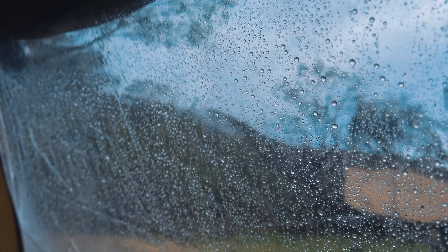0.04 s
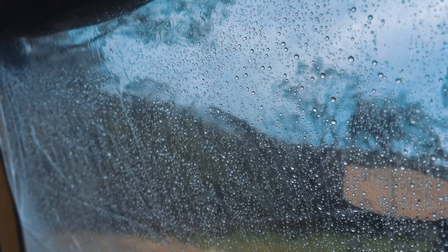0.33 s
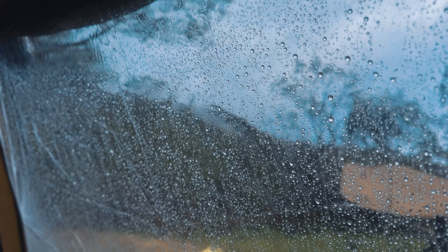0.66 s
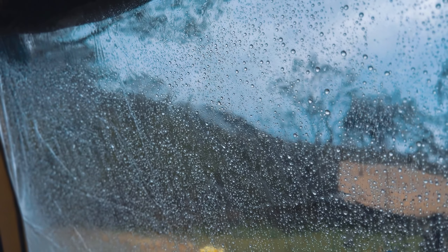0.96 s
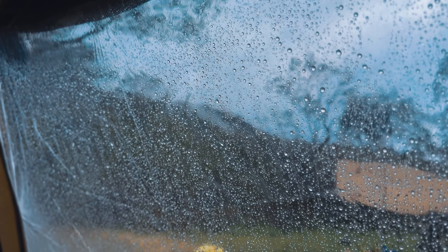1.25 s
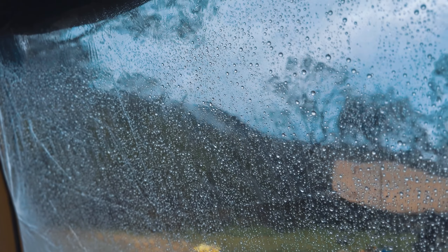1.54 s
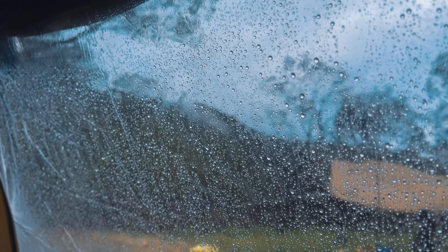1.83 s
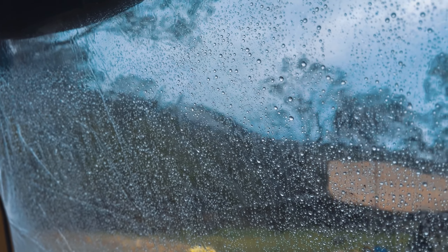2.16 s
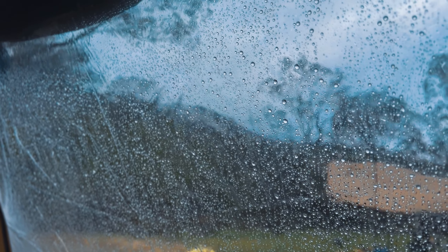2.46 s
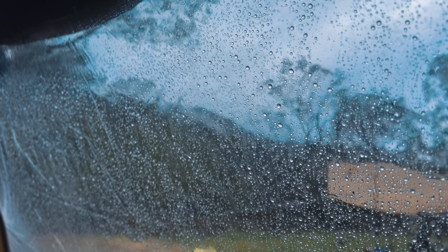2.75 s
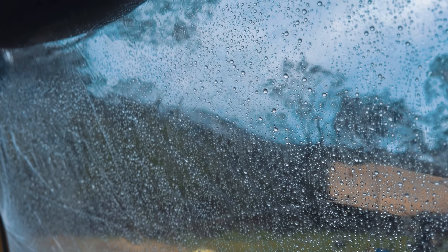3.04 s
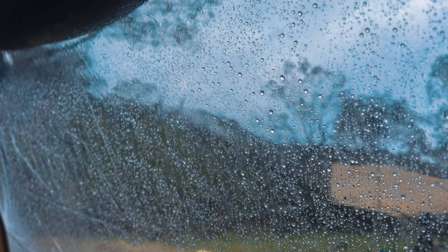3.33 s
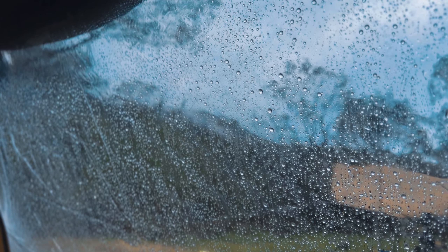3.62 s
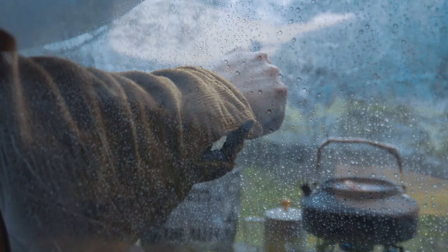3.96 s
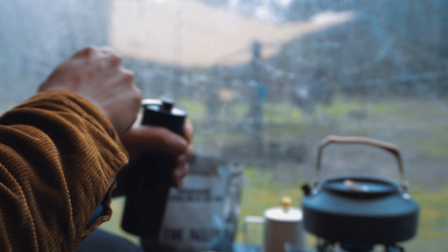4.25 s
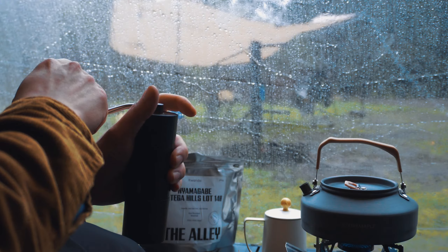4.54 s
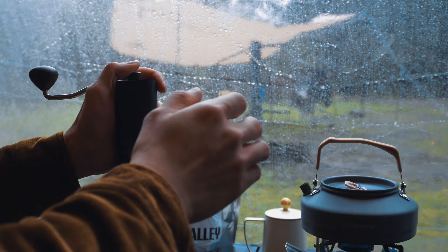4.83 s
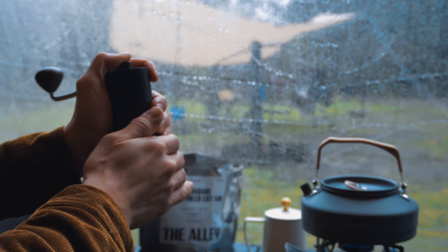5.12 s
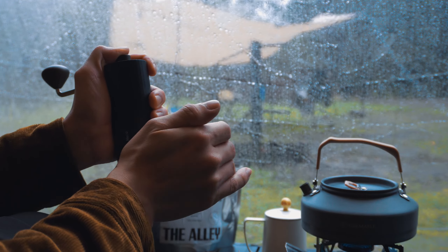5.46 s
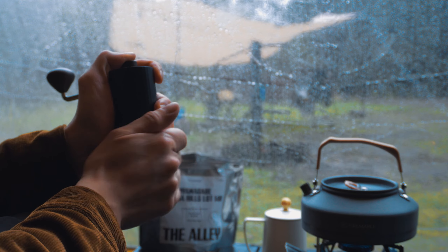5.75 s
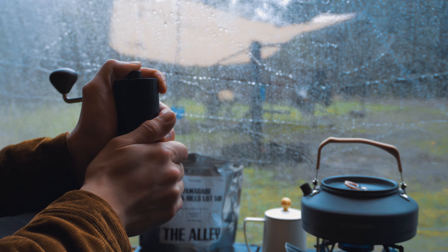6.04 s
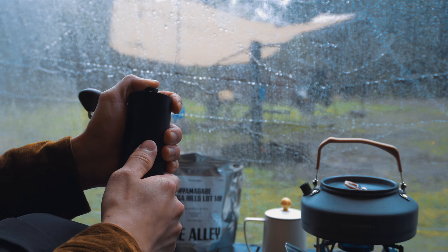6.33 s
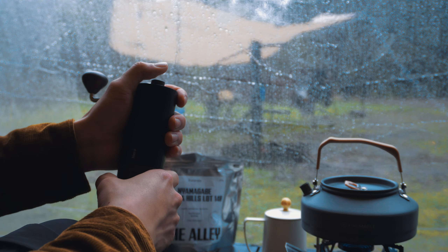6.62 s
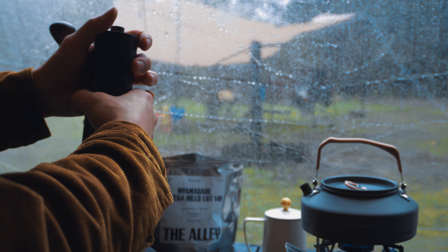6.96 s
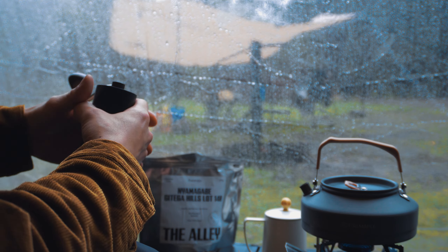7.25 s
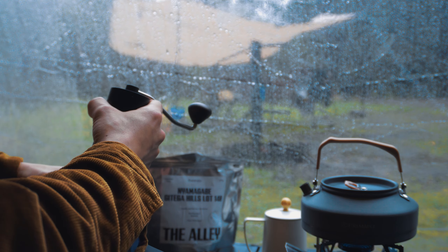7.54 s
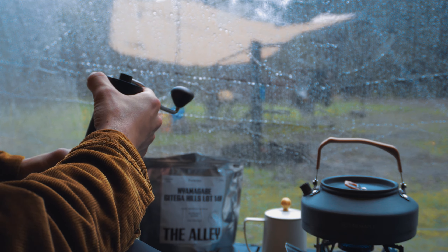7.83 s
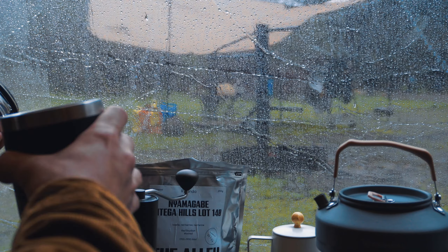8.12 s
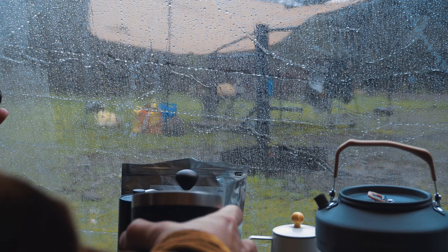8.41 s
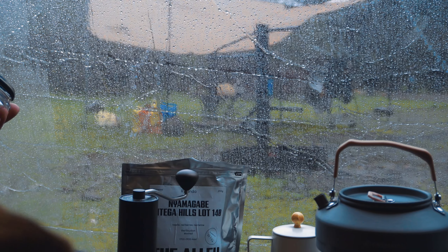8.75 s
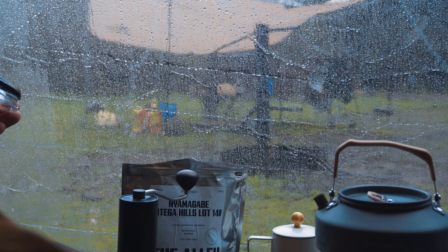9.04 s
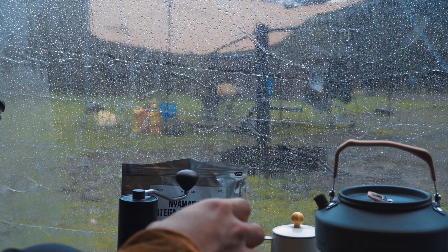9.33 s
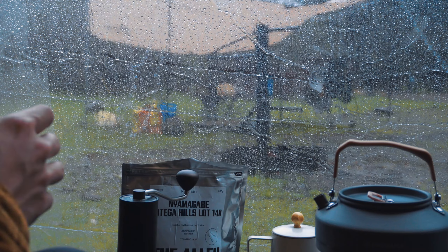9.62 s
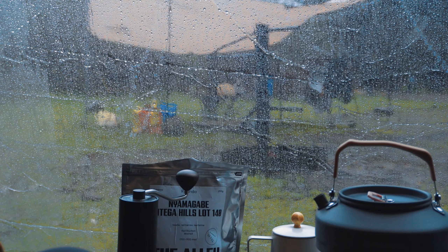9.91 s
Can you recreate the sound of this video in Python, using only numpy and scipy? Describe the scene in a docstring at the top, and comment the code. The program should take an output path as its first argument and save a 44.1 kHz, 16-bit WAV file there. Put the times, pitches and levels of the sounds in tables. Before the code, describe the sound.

Close coffee grinding by hand gives way to clacking parts and a ringing knock, with raindrops on tent fabric and a heating kettle.

```python
"""Grinding coffee in a rainy tent

Close to the microphones a hand grinder crunches beans, stalls three times, then runs empty.
Its loose parts clack as it is handled, and it lands on the table with a ringing knock.
Drops slap and thump the taut fabric near by, over a wash of rain further off. In the background
bubbles make a kettle sing softly over a gas burner, and once a sleeve brushes past."""
import sys
import numpy as np
from scipy import signal
from scipy.fft import rfft, irfft
from scipy.io import wavfile
from scipy.ndimage import uniform_filter1d, minimum_filter1d

SR = 44100
rng = np.random.default_rng(int(sys.argv[2]) if len(sys.argv) > 2 else 0)


def wav_record(signal):
    """Record a signal, one row per channel, as 16-bit PCM in the file named by sys.argv[1]."""
    frames = np.transpose(np.atleast_2d(signal))
    bounded = np.clip(frames, -1, 1)
    # unit amplitude maps onto the largest positive 16-bit level
    quanta = np.round(bounded * 32767).astype(np.int16)
    wavfile.write(sys.argv[1], SR, quanta)


N = 440118
TIME = np.arange(N) / SR
AGE = np.arange(SR // 3) / SR  # seconds since a blow
BINS = np.fft.rfftfreq(4096, 1 / SR)

# All levels in the tables are relative.
# Pushes on the crank. Each row: start and end in seconds, level in dB, rise and run-down t60 in seconds.
CRANK_PUSHES = [(0, 0.215, -26.5, 0.00067, 0.11), (0.363, 1.54, -23.5, 0.017, 0.19),
                (1.716, 3.329, -24, 0.0025, 0.1), (3.433, 3.685, -25.5, 0.004, 0.62),
                (3.752, 3.81, -34, 0.0092, 0.72)]
# The burrs briefly lose their bite. Each row: centre and half length in seconds, dip in dB.
BURR_SLIPS = [(1.779, 0.019, -9.5), (2.282, 0.012, -16), (2.339, 0.012, -14), (2.666, 0.05, -3.5),
              (3.006, 0.012, -10), (3.258, 0.034, -5)]
# The largest beans break. Each row: start in seconds, level in dB.
BEAN_CRACKS = [(0.0014, -11.5), (0.123, -5.5), (0.1783, -9.5), (0.444, -8.5), (0.9438, -7.5), (1.037, -9),
               (1.2274, -8), (1.3583, -11), (1.672, -20.5), (1.7113, -9.5), (1.746, -8), (1.944, -5.5),
               (2.128, -10), (2.2336, -5.5), (2.2847, -7), (2.2966, -13), (2.3496, -9.5), (2.4547, -12),
               (2.489, -9), (3.0345, -10), (3.0608, -5), (3.3697, -16.5), (3.4456, -8)]
# Pitch of the snap of each size of fragment in Hz, coarse to fine.
FRAGMENT_PITCHES = [1100, 1600, 2070, 2600, 3100, 3870, 5000, 7600]
# Loose parts meet. Each row: start in seconds, level in dB, t60 in seconds, tilt in dB/octave, ring in Hz.
PART_CLACKS = [(4.2624, -10.5, 0.066, 0, 2280), (4.328, -10.5, 0.076, 2, 1720),
               (5.1272, -1, 0.054, -0.5, 2290), (5.1391, -7.5, 0.087, 2, 1720),
               (5.3619, -6, 0.087, 3.5, 3150), (5.3716, -5, 0.14, -1, 1600), (5.593, -1.5, 0.12, 1.5, 3750),
               (5.8103, 1.5, 0.11, 0, 2320), (6.0263, 4, 0.06, 2.5, 4770), (6.0383, -3, 0.065, 3.5, 1600),
               (8.5372, -6.5, 0.054, 2.5, 1620), (8.618, -11, 0.055, -1, 2820)]
# The grinder lands and rocks. Each row: start in seconds, level in dB.
TABLE_BLOWS = [(8.8612, -6), (8.863, 2), (8.8705, -3)]
# Heavy drops close by. Each row: start in seconds, slap and thump in dB, tilt in dB/octave,
# snap pitch and nominal thump pitch in Hz.
NEAR_DROPS = [(0.049, -5, -29, 0, 3300, 324), (0.198, -8, -33.5, -1, 3920, 423),
              (0.263, -6.5, -37, 0, 1330, 204), (0.917, -12, -46, -1, 1320, 300),
              (1.426, -0.5, -29.5, 0.5, 2970, 500), (2.0623, -5, -44, -2, 1740, 240),
              (3.301, -2.5, -29, -1.5, 2980, 430), (3.416, -9.5, -31, -1, 1380, 740),
              (3.75, -16, -30.5, -2, 2600, 564), (4.105, -8.5, -24.5, -1, 2160, 476),
              (4.124, -12, -30.5, 0, 2300, 350), (4.565, -6.5, -30.5, -1.5, 3300, 270),
              (5.156, -1, -23.5, 0, 1400, 426), (5.65, -14.5, -30, -0.5, 2310, 387),
              (5.766, 0.5, -20, 1, 1860, 424), (7.024, -15, -39, -1, 3250, 595),
              (7.228, -10, -37, -4, 2330, 327), (7.242, -7.5, -47, 5.5, 2280, 690),
              (7.977, -12, -26.5, 0, 2290, 315), (8.534, -10, -28.5, 1.5, 1680, 380),
              (9.364, -2.5, -49, -1.5, 4800, 440), (9.892, -1.5, -25, 0, 2300, 231),
              (9.968, 4, -28, -2.5, 2420, 490)]
# The stove as the water heats. Each row: time in seconds, then flame, simmer and singing in dB.
STOVE_LEVELS = [(0, -46.5, -48.5, -54), (1.7, -46.5, -51.5, -61), (4, -42.5, -38.5, -47.5),
                (6.3, -42, -37, -46.5), (8.08, -42, -37, -43), (8.2, -42, -34.5, -39),
                (9.98, -42, -35.5, -37.5)]
# Whistle of the gas jet. Each row: time in seconds, pitch in Hz.
JET_PITCH = [(0, 8660), (4, 8710), (6.6, 8710), (8.3, 8755), (9.98, 8755)]
# A sleeve brushes past. Each row: time in seconds, level in dB.
SLEEVE_LEVELS = [(6.88, -59), (7.0, -42.5), (7.06, -47), (7.12, -42), (7.2, -56)]

# Resonances. Each row: centre in Hz, half width in Hz, level in dB.
MILL_RESONANCES = [(1772, 32, -3), (3004, 21, -4), (3265, 55, 2), (4780, 190, -10.5), (8400, 170, -40)]
CUP_RESONANCES = [(934, 58, -3.5), (1175, 32, -2), (1319, 44, 9)]  # the catch cup
KETTLE_RESONANCES = [(993, 29, -6), (1516, 18, -3), (2353, 20.4, 9), (2900, 29, -2), (3640, 200, -9.5)]
SINGING_RESONANCES = [(490, 86, -10), (1115, 59, -5.5), (1545, 39, 3.5), (1720, 27, -8), (2204, 69, 1),
                      (2814, 32, 3), (3150, 36, -13), (3370, 140, -6), (4800, 150, -8.5), (6000, 41, -32)]  # these join as the water heats

# Struck modes. Each row: pitch in Hz, level in dB, t60 in seconds.
GRINDER_MODES = [(615, -9, .06), (830, -13, 0.14), (1160, -10, 0.11), (1234, -7, 0.21), (1460, -13, .1),
                 (1786, -2, 0.3), (2320, -6, 0.23), (2910, -2.5, 0.068), (3490, -6, 0.18),
                 (3900, -13, 0.21), (5539, -18.5, 0.21), (8100, -18, 0.13)]
FABRIC_MODES = [(200, -17, 0.061), (233, -1, 0.075), (293, 4.5, 0.036), (408, 2, 0.055), (690, -6.5, 0.089)]

# Spectra. Each row: frequency in Hz, gain in dB.
CRUNCH_SPECTRUM = [(120, -48), (300, -36), (600, -18), (850, -11), (1250, -11), (1520, -7), (2100, -4.5),
                   (2900, -2.5), (4100, -7), (5000, -8), (6000, -14.5), (9000, -14), (12000, -25.5),
                   (15500, -39.5)]
CLACK_SPECTRUM = [(88, -54), (150, -14), (519, -12), (1060, -10), (1400, -2.5), (1630, -5), (1940, -8),
                  (2270, -3.5), (3480, -8.5), (4060, -7.5), (4840, -12.5), (6470, -15.5), (10500, -27.5),
                  (15500, -42)]
KNOCK_SPECTRUM = [(60, -35), (300, -10.5), (700, -10), (870, 2), (1250, 10), (1600, -1), (3000, -5),
                  (4500, -10), (8500, -23), (15000, -43)]
SLAP_SPECTRUM = [(30, -39), (80, -22), (200, -3.5), (500, -1.5), (1300, -4.5), (2500, -3), (4200, -1),
                 (6500, -9), (9000, -18.5), (15000, -37)]
FAR_RAIN_SPECTRUM = [(100, -24), (500, 9.5), (1500, 4), (3500, -4.5), (6000, -3), (9000, -6),
                     (15000, -18.5)]
FLAME_SPECTRUM = [(18, -64), (30, -24), (188, -1), (249, -5), (323, -2.5), (366, -6), (490, 0.5),
                  (647, -0.5), (803, -11.5), (982, -1.5), (1060, -11.5), (1200, -11.5), (1560, -68),
                  (2640, -120)]
SIMMER_SPECTRUM = [(400, -25.5), (750, -11), (1250, -5.5), (1700, -1.5), (2600, -4), (3700, -6), (5200, -9),
                   (6500, -16.5), (8800, -20.5), (10500, -28), (15500, -44)]  # bubbles on the kettle floor
MIC_SIDE_GAIN = [(30, -22), (150, -34), (500, -28.5), (1000, -23), (2000, -16), (4000, -9), (8000, -3.5),
                 (14000, -1.5)]  # side against mid
MIC_BALANCE = [(250, 0.3), (2000, -0.94), (12000, -1)]  # left against right

TURN_S, FREE_AT_TURN = 0.591, 0.78  # one turn of the crank; how far through it the grip is loosest
CUP_DB, CUP_SWING_DB, MILL_SWING_DB = -9, 4, 5  # cup ring; swing of cup and lowest mill ring over a turn


def grinder(crunch_db=-1, load_db=0.5, crack_db=-11, crack_t60=0.092, clump_db=1.17, brittle_db=-7):
    """Close up, fragments snap in clumps between the burrs and ring the mill and its catch cup."""
    bite, angle = crank()
    crunch_power = (bite * amp(crunch_db + load_db * drift(rate_hz=17))) ** 2  # beans feed in unevenly
    crack_power = np.zeros((1, N))
    for start, db in BEAN_CRACKS:
        add(crack_power, start, (amp(db + crack_db) * dying(crack_t60))[None] ** 2)
    snaps = evened(clicks(per_s=3400, spread_db=2) * amp(clump_db * drift(rate_hz=58)))
    snaps *= np.sqrt(crunch_power + crack_power)[0]
    snaps = fragments(from_many_spots(snaps, t60=0.045, wet_db=0.5, count=16))
    # a whole bean splits with a drier, brighter crackle than its crumbs
    splinters = wide_clicks(per_s=5900, spread_db=1.5) * np.sqrt(crack_power)
    brittle = amp(brittle_db) * colour(splinters, shape(CRUNCH_SPECTRUM, tilt_db=1.5))
    # the grip shifts with each turn, damping cup and mill and freeing them again
    free = np.cos(angle - 2 * np.pi * FREE_AT_TURN)
    crunch = shape(CRUNCH_SPECTRUM)
    (hz, width, db), *upper = MILL_RESONANCES
    loose = colour(snaps, crunch + humps([(hz, width, db + MILL_SWING_DB)] + upper))
    held = colour(snaps, crunch + humps([(hz, width, db - MILL_SWING_DB)] + upper))
    mill = (loose * (1 + free) + held * (1 - free)) / 2
    cup = colour(snaps * amp(CUP_DB + CUP_SWING_DB * free), humps(CUP_RESONANCES) * crunch)
    return mill + cup + brittle


def crank():
    """The hand's pushes give the strength of the crunch and the crank's angle, which rests in a stall."""
    bite, moving = np.zeros(N), np.zeros(N)
    for start, end, db, rise, t60 in CRANK_PUSHES:
        run_down = amp(-60 * np.maximum(TIME - end, 0) / t60)
        bite += amp(db) * np.clip((TIME - start) / rise, 0, 1) * run_down
        moving += (TIME >= start) & (TIME < end)
    slip_db = sum(db * np.exp(-((TIME - centre) / half) ** 2) for centre, half, db in BURR_SLIPS)
    angle = 2 * np.pi * np.cumsum(moving) / (TURN_S * SR)
    return bite * amp(slip_db), angle


def fragments(snaps, shift_db=2):
    """Coarse and fine fragments come in changing shares, so the colour of the crunch keeps shifting."""
    spectrum = rfft(snaps)
    log_hz = np.log(np.fft.rfftfreq(N, 1 / SR) + 1)
    bands = (np.interp(log_hz, np.log(FRAGMENT_PITCHES), one) for one in np.eye(len(FRAGMENT_PITCHES)))
    return sum(irfft(spectrum * band, N) * amp(shift_db * drift(rate_hz=21)) for band in bands)


def handling(clack_db=9, contact_db=-4, mill_db=-10, ring_db=3, seat_t60=0.0033):
    """Each clack is a hard contact and a short dense rattle; the struck part rings at its own pitch."""
    out = np.zeros((2, N))
    mill = amp(mill_db) * humps(MILL_RESONANCES)
    for start, db, t60, tilt_db, hz in PART_CLACKS:
        rattle = (scatter(t60) + amp(contact_db) * scatter(t60=0.013)) * (1 - dying(seat_t60))
        body = shape(CLACK_SPECTRUM, tilt_db) + mill + humps([(hz, 70, ring_db)])
        add(out, start, amp(db + clack_db) * colour(rattle, body))
    return out


def set_down(ring_db=-12, knock_db=11):
    """The grinder knocks on the table, rocks once, and its body rings on from the hardest blow."""
    out = np.zeros((2, N))
    for start, db in TABLE_BLOWS:
        add(out, start, amp(db + knock_db) * colour(scatter(t60=0.081), shape(KNOCK_SPECTRUM)))
    start, db = max(TABLE_BLOWS, key=lambda blow: blow[1])
    swelling = 1 - dying(t60=0.01)  # the blow takes a moment to spread through the body
    add(out, start, amp(db + ring_db) * in_tent(ring(GRINDER_MODES) * swelling, t60=0.05, wet_db=-35))
    return out


def rain(patter_db=-33, patter_thump_db=-52, spread_db=3, wash_db=-51, low_cut_hz=125, count=70):
    """Heavy drops near the microphones, a light patter over the rest of the roof, and a far wash."""
    out = np.zeros((2, N))
    for start, *blow in NEAR_DROPS:
        add(out, start, drop(*blow))
    for when, size, dullness, snap, panel in rng.uniform(0, 1, (count, 5)):
        size_db = -spread_db * np.log(size + 0.034)
        small = drop(patter_db + size_db, patter_thump_db + size_db, tilt_db=-2 * dullness,
                     snap_hz=1200 + 3000 * snap, thump_hz=170 + 350 * panel)
        add(out, when * N / SR, small)
    # the drops and patter carry no deep bass
    out = signal.sosfilt(signal.butter(2, low_cut_hz, "high", fs=SR, output="sos"), out)
    return out + amp(wash_db) * colour(rng.standard_normal((2, N)), shape(FAR_RAIN_SPECTRUM))


def drop(slap_db, thump_db, tilt_db, snap_hz, thump_hz, slap_gain_db=10, thump_gain_db=7, wet_db=-3):
    """A drop bursts on the fabric; the taut panel thumps, each spot at its own pitch."""
    burst = 0.62 * scatter(t60=0.0044) + amp(wet_db) * scatter(t60=0.097)  # spray, then reflections
    flattening = AGE / 0.00022
    burst[0] += 0.2 * unit((1 - flattening) * np.exp(-flattening))  # the drop pushes, the fabric rebounds
    burst[0, 0] += 0.25  # sharp tick of first contact
    slap = colour(burst, shape(SLAP_SPECTRUM, tilt_db) + humps([(snap_hz, 130, 1)]))
    panel = ring(FABRIC_MODES + [(thump_hz, 1.5, 0.05)], pitch=rng.uniform(1.0, 1.03))
    thump = in_tent(panel, t60=0.049, wet_db=0)
    return amp(slap_db + slap_gain_db) * slap + amp(thump_db + thump_gain_db) * thump


def stove(ring_db=1, hiss_db=-19):
    """Behind the grinder the flame roars softly, and tiny collapsing bubbles ring the kettle."""
    times, *levels = np.transpose(STOVE_LEVELS)
    flame, simmer, singing = (amp(np.interp(TIME, times, db)) for db in levels)
    roar = colour(rng.standard_normal((2, N)), shape(FLAME_SPECTRUM)) * amp(0.42 * drift(rate_hz=30))
    bubbles = evened(from_many_spots(clicks(per_s=6000, spread_db=3), t60=0.048, wet_db=-1.5))
    bubbles *= amp(0.26 * drift(rate_hz=18))
    hot_bubbles = wide_clicks(per_s=4800, spread_db=0)
    hiss = shape(SIMMER_SPECTRUM)
    water = simmer * colour(bubbles, hiss + amp(ring_db) * humps(KETTLE_RESONANCES))
    water += singing * colour(hot_bubbles, amp(hiss_db) * hiss + humps(SINGING_RESONANCES))
    return flame * roar + water


def gas_jet(level_db=-60):
    """The burner's jet whistles thinly, trembling around one slowly rising pitch."""
    tremble_hz = 24 * np.array([drift(rate_hz=70) for _ in range(2)])
    hz = np.interp(TIME, *np.transpose(JET_PITCH)) + tremble_hz
    phase = 2 * np.pi * np.cumsum(hz, 1) / SR
    return amp(level_db) * evened(np.sin(phase) * amp(2 * drift(rate_hz=40)))


def sleeve():
    """Cloth fibres slip in a soft, bright rustle."""
    level = amp(np.interp(TIME, *np.transpose(SLEEVE_LEVELS), left=-120, right=-120))
    fibres = evened(from_many_spots(clicks(per_s=4500, spread_db=1), t60=0.04, wet_db=-6, count=4))
    return level * colour(fibres, shape(SLAP_SPECTRUM, tilt_db=9.5))


def from_many_spots(x, t60, wet_db, count=14):
    """Each click starts at one of many spots, each with its own reflections."""
    spot = rng.integers(0, count, len(x))
    return sum(in_tent(x * (spot == k), t60, wet_db) for k in range(count))


def in_tent(x, t60, wet_db):
    """The direct sound reaches the microphones from the middle, short reflections from all round."""
    response = amp(wet_db) * scatter(t60)
    response[0, 0] += 1
    return signal.oaconvolve(x[None], unit(response), axes=1)[:, :len(x)]


def scatter(t60):
    """A dying spray of reflections, mid and side, of energy 1."""
    return unit(rng.choice([-1, 1], (2, len(AGE))) * dying(t60))


def ring(modes, pitch=1):
    """Struck modes ring as dying sines."""
    total = sum(amp(db) * dying(t60) * np.sin(2 * np.pi * hz * pitch * AGE) for hz, db, t60 in modes)
    return total / np.linalg.norm([amp(db) for _, db, _ in modes])


def clicks(per_s, spread_db):
    """Random clicks; the wider the spread, the more a few stand out."""
    size = amp(spread_db * np.minimum(rng.exponential(1, N), 5))
    return size * rng.choice([-1, 1], N) * (rng.random(N) < per_s / SR)


def wide_clicks(per_s, spread_db):
    """Independent clicks in mid and side, of rms 1."""
    return evened(np.array([clicks(per_s, spread_db) for _ in range(2)]))


def drift(rate_hz):
    """A random wander of rms 1, mostly slower than rate_hz."""
    roll_off = 1 + (np.fft.rfftfreq(N, 1 / SR) / rate_hz) ** 4
    return evened(irfft(rfft(rng.standard_normal(N)) / roll_off, N))


def shape(points, tilt_db=0):
    """Gain over frequency from (Hz, dB) points, tilted by tilt_db per octave above 500 Hz."""
    hz, db = np.transpose(points)
    octaves = np.log2(np.maximum(BINS, 500) / 3000)
    return amp(np.interp(np.log(BINS + 1), np.log(hz), db) + tilt_db * octaves)


def humps(modes):
    """Gain over frequency of a set of resonances."""
    return sum(amp(db) / (1 + ((BINS - hz) / width) ** 2) for hz, width, db in modes)


def colour(x, gain):
    """Minimum-phase filter shaped like gain, with an impulse response of energy 1."""
    log_gain = np.log(np.maximum(np.r_[gain, gain[-2:0:-1]], 1e-5))
    taps = np.fft.ifft(np.exp(np.conj(signal.hilbert(log_gain)))).real[:len(gain)]
    return signal.oaconvolve(x, unit(taps)[None], axes=1)[:, :x.shape[1]]


def dying(t60):
    """Envelope that falls 60 dB in t60 seconds."""
    return np.exp(-np.log(1000) * AGE / max(t60, 1e-4))


def amp(db):
    """Decibels to amplitude."""
    return 10 ** (np.asarray(db) / 20)


def evened(x):
    """Scales to rms 1."""
    return x / np.sqrt(np.mean(x ** 2) + 1e-20)


def unit(x):
    """Scales each row to energy 1."""
    return x / np.sqrt(np.sum(x ** 2, -1, keepdims=True) + 1e-20)


def add(mix, start, sound):
    """Mixes a sound in at start seconds."""
    part = mix[:, max(round(start * SR), 0):][:, :sound.shape[1]]
    part += sound[:, :part.shape[1]]


def scene():
    """A close pair of microphones in the tent hears the bass as one, the treble apart and a touch right."""
    mid, side = rfft(grinder() + rain() + handling() + set_down() + stove() + gas_jet() + sleeve())
    hz = np.fft.rfftfreq(N, 1 / SR)
    side *= np.interp(hz, BINS, shape(MIC_SIDE_GAIN))
    lean = np.sqrt(np.interp(hz, BINS, shape(MIC_BALANCE)))
    return irfft(np.array([(mid + side) * lean, (mid - side) / lean]), N)


def record(dry, ceiling=0.8, edge_hz=15900):
    """The recorder's fast limiter holds the sharpest peaks down; a low-pass trims the top treble."""
    allowed = np.minimum(1, ceiling / (abs(dry).max(0) + 1e-9))
    limited = dry * uniform_filter1d(minimum_filter1d(allowed, size=65), size=65)
    low_pass = signal.firwin(511, edge_hz, window=("kaiser", 9), fs=SR)
    return signal.oaconvolve(limited, low_pass[None], "same")


dry = scene()
out = record(dry)
wav_record(out)
```